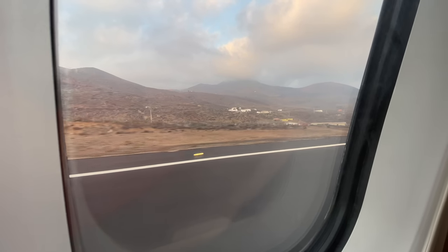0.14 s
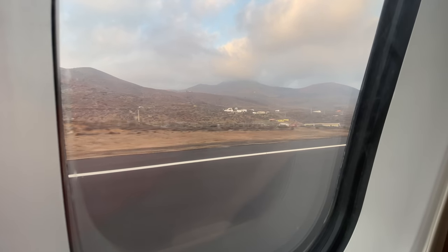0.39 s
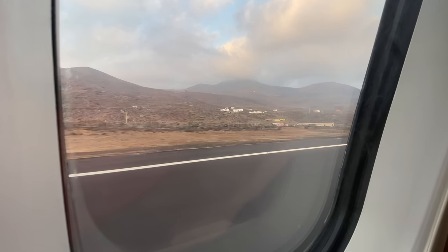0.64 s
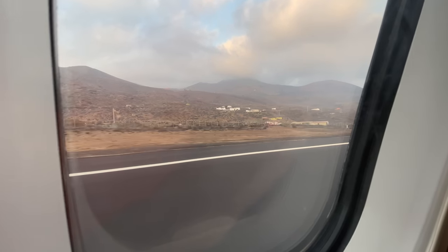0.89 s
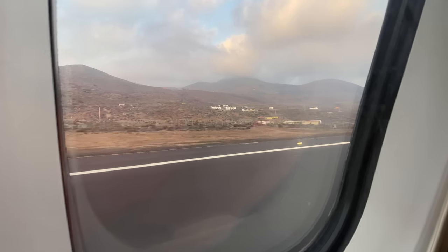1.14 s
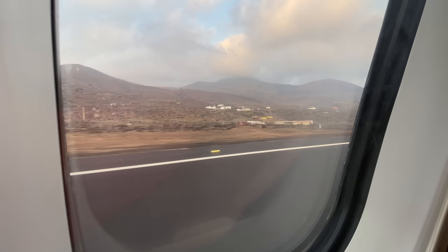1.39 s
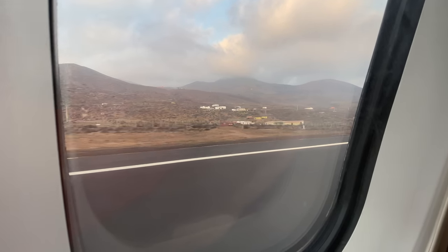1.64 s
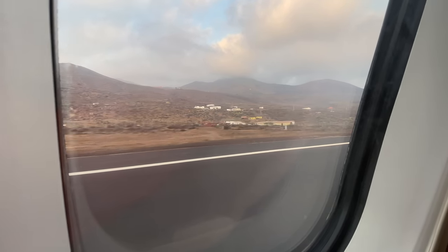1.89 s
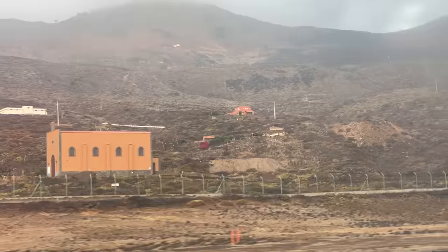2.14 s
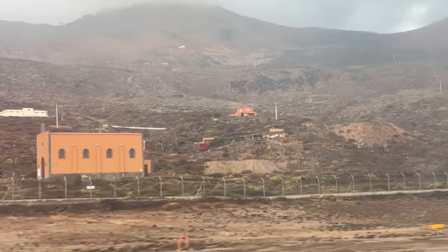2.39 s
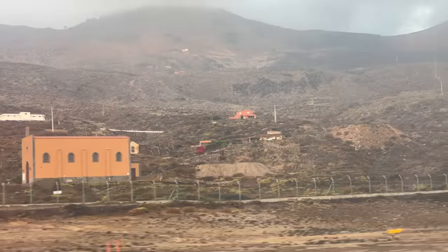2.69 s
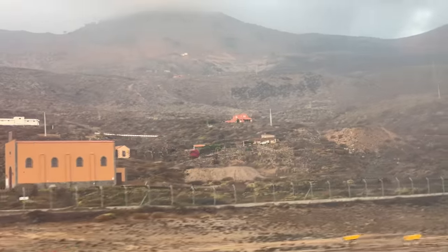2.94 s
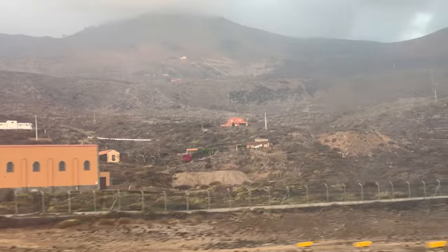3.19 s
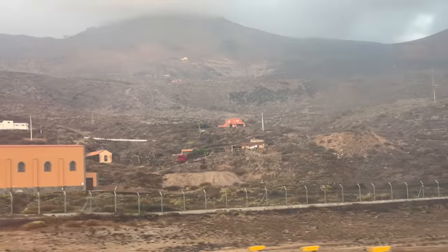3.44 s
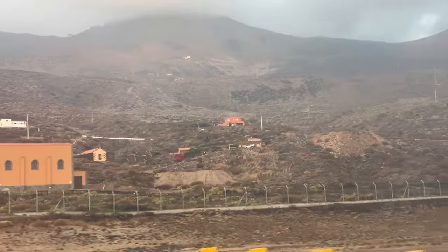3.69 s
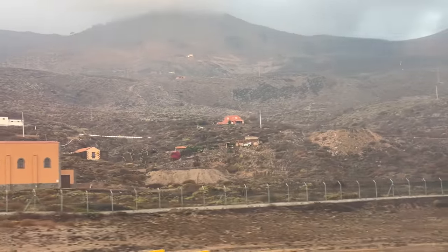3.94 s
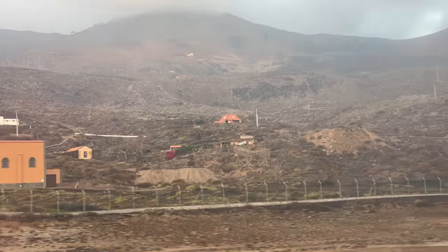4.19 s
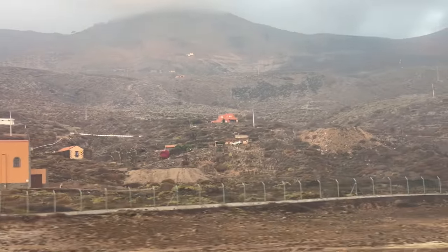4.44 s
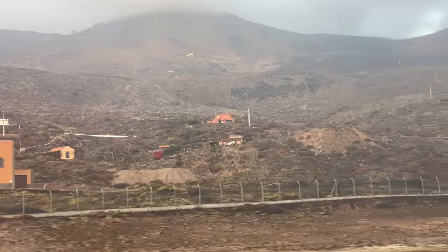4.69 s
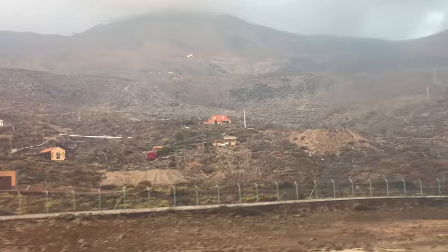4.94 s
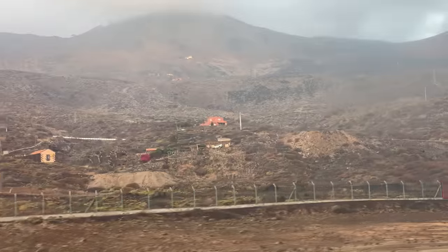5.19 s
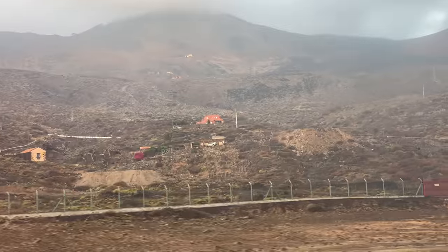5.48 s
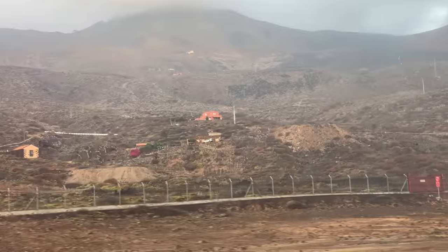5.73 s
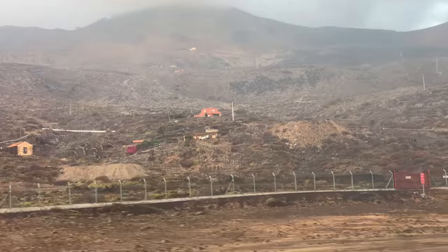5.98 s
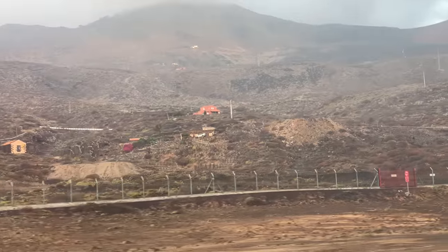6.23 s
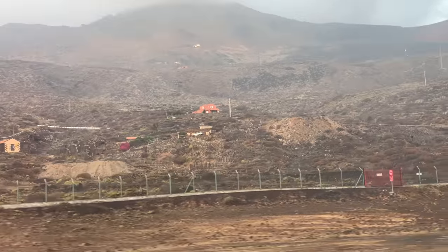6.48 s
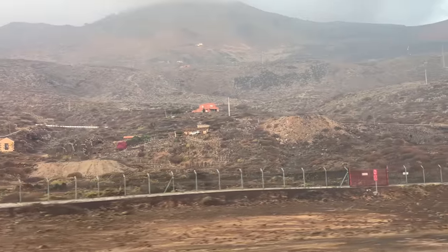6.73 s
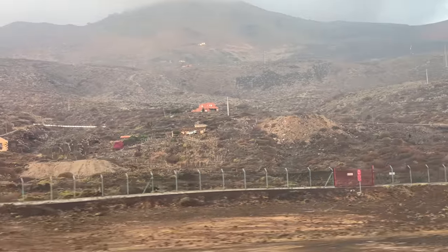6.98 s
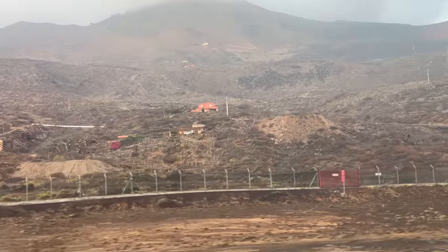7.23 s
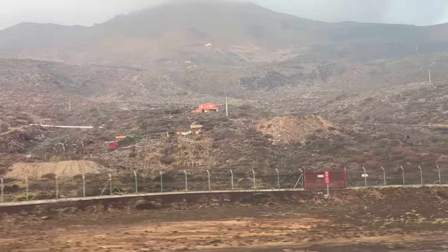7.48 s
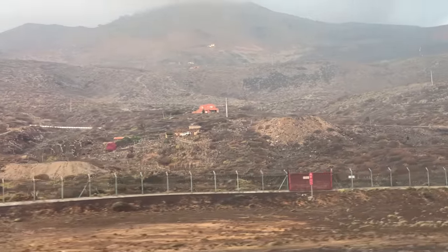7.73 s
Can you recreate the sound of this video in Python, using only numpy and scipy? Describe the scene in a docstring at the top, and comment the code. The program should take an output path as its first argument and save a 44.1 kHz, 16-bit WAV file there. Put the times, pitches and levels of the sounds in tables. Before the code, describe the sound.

Inside a propeller aircraft cabin, a broad landing-roll roar drops after two seconds to a fluttering blade drone, with a loose fitting rattling briefly.

```python
"""Propeller blades, tyres and airflow of a twin-propeller aircraft, heard by a phone at the cabin window. A
fast landing roll, tyres and reversed blades, is a broad roar of shaped noise with panel resonances. The scene
then changes, fading into a slower roll: fluttering blade tones (narrow noise bands), a cabin boom (resonant
noise), a turbine whine (wavering sines) and duct hiss (noise pumped at blade rate). A loose fitting rattles in
brief bursts of noise and decaying sines."""
import sys
import numpy as np
from scipy import signal
from scipy.fft import irfft, next_fast_len
from scipy.io import wavfile
from scipy.ndimage import uniform_filter1d, minimum_filter1d

SR = 44100
rng = np.random.default_rng(int(sys.argv[2]) if len(sys.argv) > 2 else 0)


def undo_db(level):
    """Turn decibels back into plain size, where 20 dB means ten times bigger."""
    steps = np.asarray(level, float) / 20
    return 10 ** steps


def waveform_to_disk(signal):
    """Save audio, clipped to [-1, 1], as 16-bit WAV at the path in sys.argv[1]."""
    frames = np.transpose(np.atleast_2d(signal))
    scaled = np.clip(frames, -1, 1) * 32767
    samples = np.round(scaled).astype(np.int16)
    wavfile.write(sys.argv[1], SR, samples)


N = 347067
SIZE = next_fast_len(N)
HZ = np.maximum(np.arange(SIZE // 2 + 1) * SR / SIZE, 1)
TIME = np.arange(N) / SR
SLOW_BLADE_HZ = 83.5

# Air duct resonances. Each row: centre in Hz, width in Hz, level in dB over the hiss.
DUCTS = [(2136, 225, 4), (3270, 130, -7.5), (4120, 320, -5), (4480, 220, -25)]


def unit(x):
    """Scale to rms 1."""
    return x / np.sqrt(np.mean(x ** 2))


def noise():
    """Spectrum of fresh white noise."""
    real, imaginary = rng.standard_normal((2, len(HZ)))
    return real + 1j * imaginary


def wave(spectrum):
    """Back from spectrum to sound."""
    return irfft(spectrum, SIZE)[..., :N]


def curves(table):
    """Columns of a table as values per sample."""
    s, *columns = np.transpose(table)
    return [np.interp(TIME, s, column) for column in columns]


def walk(rate_per_s):
    """Random values joined smoothly, rms 1."""
    steps = rng.standard_normal(int(TIME[-1] * rate_per_s) + 2)
    joined = np.interp(TIME * rate_per_s, np.arange(len(steps)), steps)
    return unit(uniform_filter1d(joined, int(SR / rate_per_s)))


def colour(table, open_top=False):
    """Gain per frequency from (Hz, dB) points; silent outside them unless the top is open."""
    hz, db = np.transpose(table)
    silent_db = -200
    above_db = db[-1] if open_top else silent_db
    return undo_db(np.interp(np.log(HZ), np.log(hz), db, left=silent_db, right=above_db))


def ring(hz, width_hz, steep=1.61):
    """Gain per frequency of one resonance."""
    return (1 + (2 * (HZ - hz) / width_hz) ** 2) ** (-steep / 2)


def modes(table, steep=1.43):
    """Gain of several resonances, their powers added."""
    return np.sqrt(sum((undo_db(db) * ring(hz, width_hz, steep)) ** 2 for hz, width_hz, db in table))


def sides(pan_db):
    """Left and right gains of a level difference."""
    return undo_db(np.array([pan_db, -pan_db]) / 2)


def ports(mid, side, side_db, pan=None, lag=0):
    """Noise common to both microphone ports, panned in level and phase, plus an opposed part, partly lagging."""
    common = noise()
    both = common * mid
    if pan:
        hz, db, lead_rad = np.transpose(pan)
        # directionless above the roar
        aimed = 1 / (1 + (HZ / 1450) ** 12)
        db, lead_rad = (aimed * np.interp(np.log(HZ), np.log(hz), column) for column in (db, lead_rad))
        both = both * sides(db) * np.exp(.5j * lead_rad * np.array([[1], [-1]]))
    differs = np.sqrt(1 - lag ** 2) * noise() + 1j * lag * common
    apart = undo_db(side_db) * unit(wave(differs * side))
    return unit(wave(both)) + np.array([apart, -apart])


def evened(x, even):
    """A rumble whose own swells are flattened, so it wanders in pitch more than in size."""
    size = np.sqrt(uniform_filter1d(np.mean(x ** 2, axis=0), int(0.015 * SR)) + 1e-12)
    return unit(x / (size + 0.28) ** even)


def booms(table, levels, side_db, pan):
    """The two deep and the two upper cabin resonances swell apart."""
    pairs = modes(table[:2], steep=2.3), modes(table[2:], steep=1.46)
    return sum(level * evened(ports(pair, pair, side_db, pan), 1.0) for level, pair in zip(levels, pairs))


def chop(blade_hz, blade_depth, shaft_depth):
    """Each passing blade, and each turn of the propeller, pumps the airflow hiss; the rate wavers."""
    blade_count = 6
    turn_hz = blade_hz / blade_count * (1 + 0.0047 * walk(1.26))
    turn = 2 * np.pi * np.cumsum(turn_hz) / SR
    return 1 + blade_depth * np.sin(blade_count * turn) + shaft_depth * np.sin(turn)


def tone(hz):
    """A sine of rms 1 whose pitch wavers slightly."""
    waver = 1 + .0002 * walk(4)
    return np.sqrt(2) * np.sin(2 * np.pi * np.cumsum(hz * waver) / SR)


def whine(table):
    """Faint accessory tones, unsteady in level."""
    return sum(undo_db(db + 2 * walk(3)) * tone(hz) for hz, db in table)


def fast_roll(boom, roar, hiss):
    """Broad tyre and reverse-thrust roar through the cabin panels."""
    # Roar and hiss, common and differing between ports. Each row: frequency in Hz, relative density in dB per Hz.
    roar_common, roar_side = [(53, -35), (90, -2.5), (141, 1.5), (173, -14), (217, -0.5), (366, -8.5),
                              (406, -2), (573, -16), (642, -10.5), (1900, -35), (2470, -56), (4180, -120)], [(24, -44), (40, -16), (80, -8), (155, -6), (225, -2),
                                                 (256, -3.5), (437, -6), (613, -4.5), (1900, -21),
                                                 (2470, -48), (4180, -120)]
    hiss_common, hiss_side = [(1120, -55), (1900, -4), (2680, 0.5), (3000, -2), (4110, -5.5), (5030, -5.5),
                              (5550, -13), (6050, -5), (7410, -12), (8300, -9), (9900, -12), (10800, -17.5),
                              (11900, -12.5), (13900, -13.5), (15500, -41)], [(1120, -32), (1900, -9), (2730, -6), (3270, -10),
                                                 (3740, -12.5), (5090, -16), (5590, -16), (6250, -17),
                                                 (6870, -18), (7490, -23), (8300, -14), (11300, -27),
                                                 (12300, -40), (13000, -80)]
    # Port difference. Each row: frequency in Hz, left minus right in dB, left lead in rad.
    pan = [(60, 0.5, 0.035), (150, 0.5, 0.27), (250, 1, 0.18), (420, -0.5, 0.1), (700, 5, -0.56),
           (1300, 6.5, -0.6)]
    # Cabin resonances. Each row: centre in Hz, width in Hz, relative level in dB.
    boom_modes = [(49, 9.5, -12), (61, 7.8, -2.5), (75.3, 2.8, 1), (94.7, 2.3, -12)]
    # Panels ringing under the roar. Each row: centre in Hz, width in Hz, relative level in dB.
    panels = [(147, 32, -5), (236, 65, -7.5), (316.5, 62, -5.5), (446, 12, -22), (473, 40, -10.5),
              (615, 80, -15), (900, 260, -24), (1477, 44, -25)]
    # Accessory whines. Each row: frequency in Hz, mean level in dB.
    whines = [(4156, -76), (5889, -76), (8000, -84), (9033, -81), (11962, -85)]
    blade_hz = 92

    body = undo_db(1.0) * ports(colour(roar_common), colour(roar_side), -9.5, pan)
    body = body + undo_db(-3.0) * ports(modes(panels), modes(panels), -16.0, pan)
    ducted = (1 + modes(DUCTS)) * colour(hiss_common, open_top=True)
    air = ports(ducted, colour(hiss_side), -0.54)
    air = undo_db(3.0) * chop(blade_hz, 0.082, 0.037) * air
    return booms(boom_modes, boom, -24.5, pan) + roar * body + hiss * air + whine(whines)


def strong_levels():
    """Each strong blade tone flutters about its slowly moving level and now and then swells."""
    # Each row: time in seconds, level in dB of the third, fourth and fifth multiple of the blade rate.
    strong_tones = [(2.2, -37.5, -37.5, -37), (2.7, -33, -32.5, -33), (3.2, -33, -35.5, -38.5),
                    (3.7, -33, -34.5, -34.5), (4.1, -32, -35.5, -38.5), (4.5, -33, -34.5, -35),
                    (5.0, -32.5, -35, -36), (5.4, -34, -31.5, -38.5), (5.9, -32.5, -32.5, -31.5),
                    (6.4, -33, -34.5, -38), (6.9, -36, -38, -35), (7.4, -32, -34, -37),
                    (7.87, -31.5, -36.5, -35)]
    # Each row: centre in seconds, index among the three, rise in dB, half length in seconds (to 1/e of the rise).
    swells = [(4.797, 0, 6.5, 0.095), (6.556, 1, 11.5, 0.063), (7.493, 0, 2.5, 0.12)]
    flutter_db, flutter_per_s = 1.5, 14
    levels_db = [db + flutter_db * walk(flutter_per_s) for db in curves(strong_tones)]
    for s, which, rise_db, half_s in swells:
        levels_db[which] = levels_db[which] + rise_db * np.exp(-((TIME - s) / half_s) ** 2)
    return levels_db


def blades(roar):
    """Blades cut eddies that last a few passages: each multiple of the blade rate is a narrow fluttering tone."""
    # One row a multiple, from the second up: width in Hz, relative level in dB (the third to fifth are
    # rescaled by strong_levels), left minus right in dB, left lead in rad.
    blade_tones = [(17.3, -5, 3, 0.27), (14.7, -3, 5.5, -0.042), (16.4, -5, 3.5, 0.65),
                   (14.9, -4.5, -1.5, 0.2), (15.8, -12, 6.5, 0.53), (22.4, -17, 5, -0.00091),
                   (18, -18, 11.5, -0.23), (22, -21.5, 10, -1.64), (35, -25, 9, -1.4), (35, -28, 1, -1.55),
                   (40, -29, 3, -1.9)]
    skirt_share, skirt_db = 0.029, -10  # weaker, broader skirt this share below each tone
    even = .4  # exponent flattening a tone's own swells
    tones = []
    for multiple, (width_hz, db, pan_db, lead_rad) in enumerate(blade_tones, 2):
        hz = multiple * SLOW_BLADE_HZ
        skirt = undo_db(skirt_db) * ring(hz - skirt_share * hz, 2.1 * width_hz, steep=2.7)
        shape = undo_db(db) * np.hypot(ring(hz, width_hz, steep=1.87), skirt)
        place = sides(pan_db) * np.exp(.5j * lead_rad * np.array([1, -1]))
        # the second propeller's share reaches the ports unalike
        apart = undo_db(-12.5) * noise() * (HZ < 1700)
        tones.append(shape * place[:, None] * (noise() + np.array([apart, -apart])))
    strong = sum(undo_db(db) * evened(unit(wave(x)), even) for db, x in zip(strong_levels(), tones[1:4]))
    others = unit(wave(tones[0] + sum(tones[4:])))
    return strong + roar * undo_db(-3.5) * others


def turbine_whine():
    """A wavering turbine sine, with fainter tones one blade rate away as the blades pump it."""
    # Each row: time in seconds, frequency in Hz.
    pitch = [(2.1, 4147), (3.0, 4156), (4.5, 4154), (5.1, 4152), (6.0, 4147), (7.87, 4144)]
    # Each row: time in seconds, mean level in dB.
    level = [(2.1, -79), (2.35, -68), (2.49, -77), (2.56, -66.5), (2.98, -67), (3.08, -75), (3.3, -73),
             (3.6, -80), (4.3, -78), (4.6, -67), (5.05, -66), (5.2, -80), (5.7, -78), (5.85, -67),
             (6.25, -73), (6.6, -70), (7.25, -68), (7.4, -78), (7.7, -74), (7.87, -66)]
    sideband_db = -81
    (hz,), (db,) = curves(pitch), curves(level)
    turbine = undo_db(db + 2.5 * walk(18)) * tone(hz)
    for off_hz in -SLOW_BLADE_HZ, SLOW_BLADE_HZ:
        turbine = turbine + undo_db(sideband_db + 3.0 * walk(3.5)) * tone(hz + off_hz)
    return turbine


def side_whine():
    """A faint tone near the port null, opposite at the two ports."""
    hz, mean_db = 8300, -82
    return undo_db(mean_db + 2.5 * walk(3)) * tone(hz) * np.array([[1], [-1]])


def top_hiss():
    """A grainy hiss at the top of the range, pumped by the blades, alike at both ports."""
    # Each row: time in seconds, level in dB before graining.
    level = [(1.9, -72), (2.3, -71), (2.55, -64), (3.1, -67), (3.3, -72), (4.0, -85)]
    # Each row: centre in Hz, width in Hz, relative level in dB.
    top_bands = [(12200, 500, 0), (13500, 2500, -5), (11100, 1400, -8)]
    grain = undo_db(1.5 * walk(120)) * chop(SLOW_BLADE_HZ, 0.2, 0.1)
    bands = modes(top_bands, steep=2.7) * (HZ > 9600)
    return undo_db(curves(level)[0]) * grain * unit(wave(noise() * bands))


def slow_roll(boom, roar, hiss):
    """Blade tones stand out of a weaker roar, over boom, hiss and turbine whine."""
    # Roar and hiss, common and differing between ports. Each row: frequency in Hz, relative density in dB per Hz.
    roar_common, roar_side = [(53, -23), (90, -6), (144, -4), (204, -16.5), (247, -12), (291, -13),
                              (416, -16), (537, -21.5), (700, -20.5), (790, -28), (880, -20), (1020, -25),
                              (1900, -37.5), (2470, -58), (4180, -120)], [(24, -36), (40, -12), (130, -4), (203, -20), (250, -1),
                                                 (372, -15), (416, -14), (450, -3), (1000, -22),
                                                 (1600, -40), (1800, -100)]
    hiss_common, hiss_side = [(1120, -48), (1900, -7.5), (2490, -2.5), (2900, -1.5), (3870, -7),
                              (4300, -6.5), (4820, -6.5), (7090, -10), (8230, -15), (8600, 17), (9310, -13),
                              (10800, -9.5), (11700, -9), (13800, -7.5), (15500, -13.5)], [(6750, -60), (6950, -8), (7400, -3), (8300, 1.5),
                                                 (10300, 1), (11000, -3), (12200, -6), (12600, -13),
                                                 (13000, -15)]
    # Port difference. Each row: frequency in Hz, left minus right in dB, left lead in rad.
    pan = [(60, 1.7, 0.26), (110, 3, 0.5), (200, 5.5, 0.74), (380, 3.3, 0.2), (700, 8.4, 0.15),
           (1300, 5.8, -0.2)]
    # Cabin resonances. Each row: centre in Hz, width in Hz, relative level in dB.
    boom_modes = [(45.3, 18, -10), (63.2, 20.3, 6), (77.2, 21.6, -7), (87.3, 3.8, -1.5)]
    # Panels ringing under the roar. Each row: centre in Hz, width in Hz, relative level in dB.
    panels = [(120.6, 13.7, -6), (125.9, 3.1, -2)]
    null_hz = 8800  # half a wavelength between the ports: their sum cancels
    lag_share = 0.7  # share of the port difference that is the same hiss arriving late

    low = booms(boom_modes, boom, -26.0, pan)
    low = low + undo_db(-28.0) * ports(modes(panels), modes(panels), -23.0, pan)
    body = undo_db(-2.5) * ports(colour(roar_common), colour(roar_side), -6.5, pan)
    null = 1 - 1 / (1 + ((HZ - null_hz) / 520) ** 6)
    ducted = null * (1 + modes(DUCTS)) * colour(hiss_common, open_top=True)
    air = ports(ducted, colour(hiss_side), -6, lag=lag_share * np.sign(HZ - null_hz))
    air = undo_db(1.5) * chop(SLOW_BLADE_HZ, 0.053, 0.035) * air
    # three duct resonances sing unsteadily
    for hz, db in (2950, -13.0), (4530, -16.5), (5300, -21.0):
        unsteady_db = 2.5 * walk(3)
        air = air + undo_db(db + unsteady_db) * unit(wave(noise() * ring(hz, 220, steep=2.1)))
    whines = turbine_whine() + side_whine()
    return low + roar * body + blades(roar) + hiss * air + whines + top_hiss()


def rattle():
    """Each jolt: a knock, a ringing tick and its rebounds, the fitting's upper modes buzzing, a dry rustle."""
    # Each row: start in seconds, knock in dB (before a 6.5 dB cut), buzz in dB (before pulsing),
    # rustle in dB (before a 5 dB cut), buzz length in seconds, tick in dB.
    jolts = [(2.131, -33, -46, -65, 0.09, -39), (2.3225, -27, -36.5, -56, 0.047, -30),
             (2.518, -25, -38, -55, 0.049, -32), (2.705, -33, -41, -52, 0.047, -30),
             (2.892, -38, -47, -57, 0.03, -33.5), (3.069, -39, -57, -51, 0.035, -54),
             (3.278, -34, -53, -53, 0.032, -48), (7.713, -32, -50, -62, 0.043, -52)]
    # Modes of the fitting. Each row: centre in Hz, width in Hz, relative level in dB.
    fitting = [(1070, 560, 14), (1610, 1200, -7), (2150, 190, -10.5)]
    # Modes of the tick. Each row: frequency in Hz, width in Hz (sets the decay), level in dB over the tick.
    tick_modes = [(1150, 200, -4), (1400, 140, -2), (1650, 160, -4), (1870, 130, 1), (2210, 95, 1.5),
                  (2450, 120, -3)]
    # The tick and its weaker rebounds. Each row: delay after the jolt in seconds, level in dB.
    bounces = [(0.0015, 0), (0.011, -4), (0.027, -5)]
    # Rustle, common and differing between ports. Each row: frequency in Hz, relative density in dB per Hz.
    rustle_common, rustle_side = [(2500, 1), (4000, 0), (6000, -2), (8000, -6), (8600, -25)], [(6900, -12), (8000, -4), (9500, -6), (11000, -14)]
    contact_s = .003  # soft contact: build-up time of the tick modes

    knock, buzz, rustle, tick = np.zeros((4, N))
    for s, knock_db, buzz_db, rustle_db, length_s, tick_db in jolts:
        now = slice(int(s * SR), int((s + .2) * SR))
        age_s = np.maximum(TIME[now] - s, 0)
        rise = np.clip(age_s / 0.004, 0, 1)
        pulsing = 0.52 + 0.19 * np.cos(2 * np.pi * age_s / 0.0152)
        knock[now] += undo_db(knock_db - 6.5) * rise * np.exp(-age_s / 0.011)
        buzz[now] += undo_db(buzz_db) * rise * pulsing * np.exp(-(age_s / length_s) ** 3)
        for delay_s, db in bounces:
            struck_s = np.maximum(age_s - delay_s, 0)
            push = np.sin(np.pi / 2 * np.clip(struck_s / contact_s, 0, 1)) ** 2
            for hz, width_hz, mode_db in tick_modes:
                decay = np.exp(-np.pi * width_hz * struck_s)
                level = undo_db(tick_db + db + mode_db)
                tick[now] += level * push * decay * np.sin(2 * np.pi * hz * struck_s)
        rustle[now] += undo_db(rustle_db - 5.0) * rise * np.exp(-(age_s / 0.054) ** 2)
    edge = 1 / (1 + (HZ / 2650) ** 16)
    layers = (knock, edge * modes(fitting)), (buzz, edge * modes(fitting[1:]))
    # knock and buzz differ between the ports only below this
    wide = HZ < 2000
    dry_rustle = rustle * ports(colour(rustle_common), colour(rustle_side), -6)
    return tick + dry_rustle + sum(shape * ports(gain, gain * wide, -14) for shape, gain in layers)


def scene():
    """The fast roll fades into the slow one at equal power, under a rattling fitting."""
    # Each row: time in seconds, fade position from fast (0) to slow (1).
    change = [(0, 0), (1.75, 0.17), (2.0, 0.27), (2.25, 1), (7.87, 1)]
    # Cabin boom. Each row: time in seconds, deep resonances in dB, upper resonances in dB, before flutter.
    boom_levels = [(0, -21.5, -22.5), (0.35, -22.5, -30.5), (1.1, -25, -23), (1.7, -27.5, -25.5),
                   (2.1, -23.5, -35.5), (2.75, -22.5, -26.5), (3.1, -27.5, -27), (3.7, -21, -34),
                   (3.95, -36, -26), (4.15, -26, -23.5), (4.6, -24, -25.5), (5.5, -22.5, -28.5),
                   (6.0, -26, -24.5), (6.4, -25, -26.5), (6.95, -22.5, -22.5), (7.4, -23, -27),
                   (7.65, -17.5, -30.5), (7.87, -25.5, -25)]
    # Each row: time in seconds, roar in dB, hiss in dB, before each roll's own trims.
    airflow = [(0, -23.5, -52), (0.5, -23.5, -53), (0.75, -23.5, -53), (1.15, -23, -52.5), (1.6, -24, -53),
               (2.15, -28, -58), (4.0, -28, -56.5), (5.7, -27.5, -57), (6.8, -29, -56.5),
               (7.87, -28.5, -56)]
    flutter_db, flutter_per_s = 2.5, 12
    boom = [undo_db(db + flutter_db * walk(flutter_per_s)) for db in curves(boom_levels)]
    roar, hiss = [undo_db(db) for db in curves(airflow)]
    angle = np.pi / 2 * np.clip(curves(change)[0], 0, 1)
    fast = np.cos(angle) * fast_roll(boom, roar, hiss)
    slow = np.sin(angle) * slow_roll(boom, roar, hiss)
    return fast + slow + rattle()


def top_cut(x):
    """Nothing passes above the cut-off."""
    return signal.sosfilt(signal.butter(12, 15640, fs=SR, output="sos"), x)


def record(dry):
    """The phone's microphone loses the deepest bass; a quick limiter shared by both channels rounds the peaks."""
    heard = signal.sosfilt(signal.butter(3, 38, "high", fs=SR, output="sos"), dry)
    hold = int(.002 * SR)
    loudest = -minimum_filter1d(-np.abs(heard).max(axis=0), hold)
    peak = uniform_filter1d(loudest, hold) + 1e-9
    limiter_gain = np.tanh(2.22 * peak) / (1.867 * peak)
    ends = np.clip(np.minimum(TIME, TIME[::-1]) / .004, 0, 1)  # 4 ms fades
    return top_cut(ends * heard * limiter_gain)


dry = scene()
out = record(dry)
waveform_to_disk(out)
```